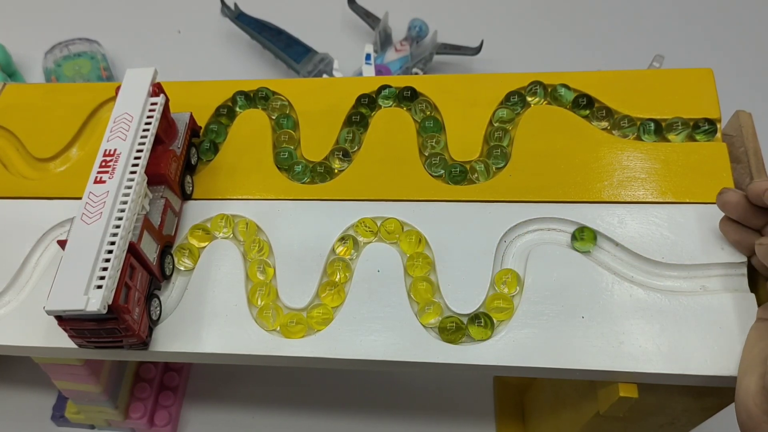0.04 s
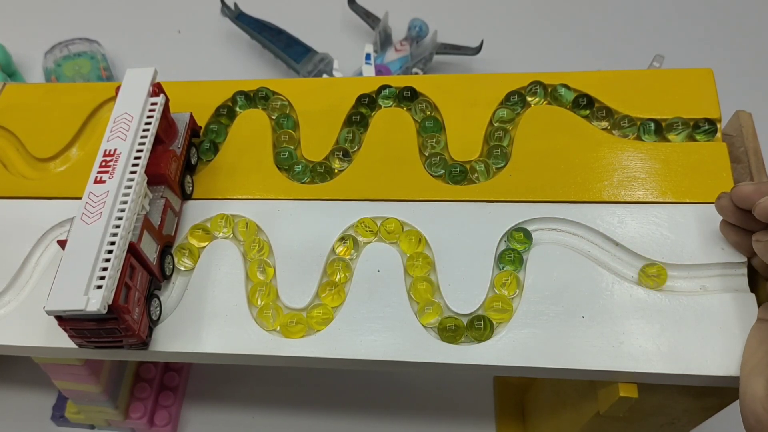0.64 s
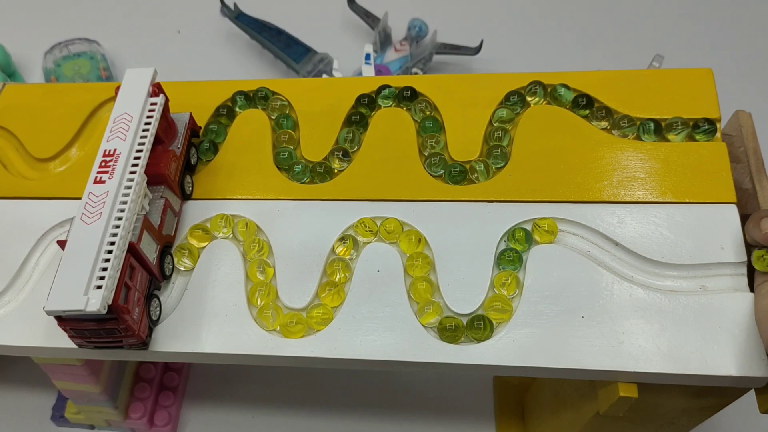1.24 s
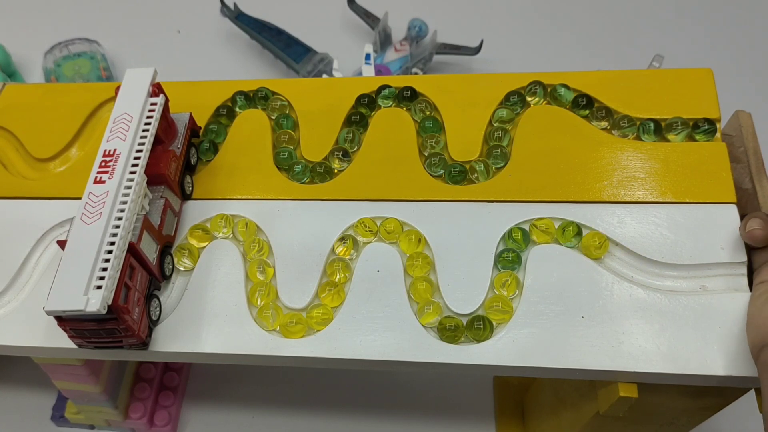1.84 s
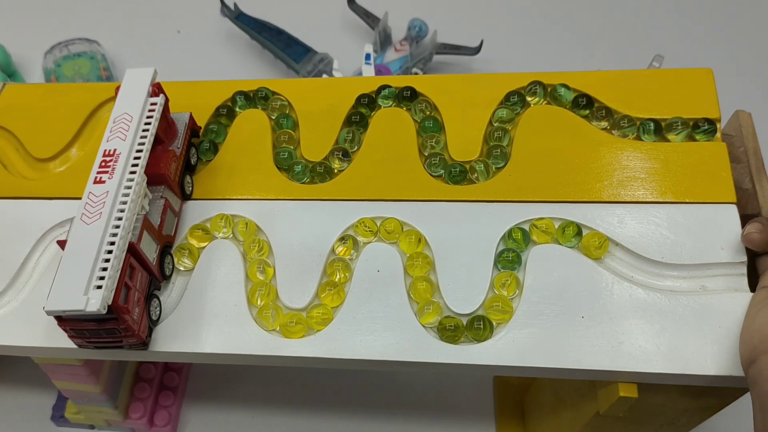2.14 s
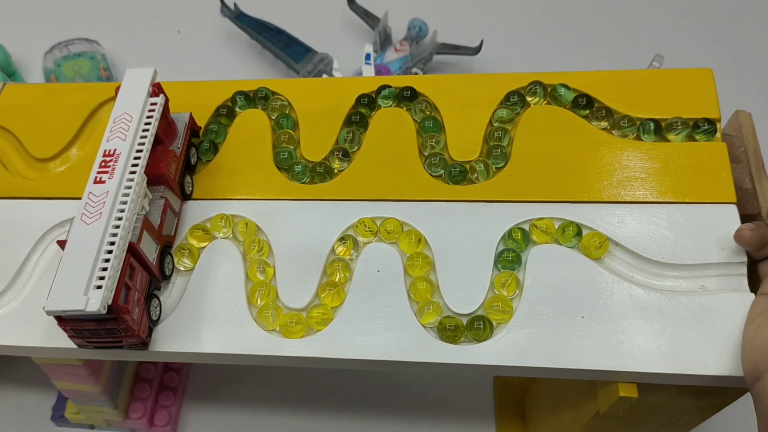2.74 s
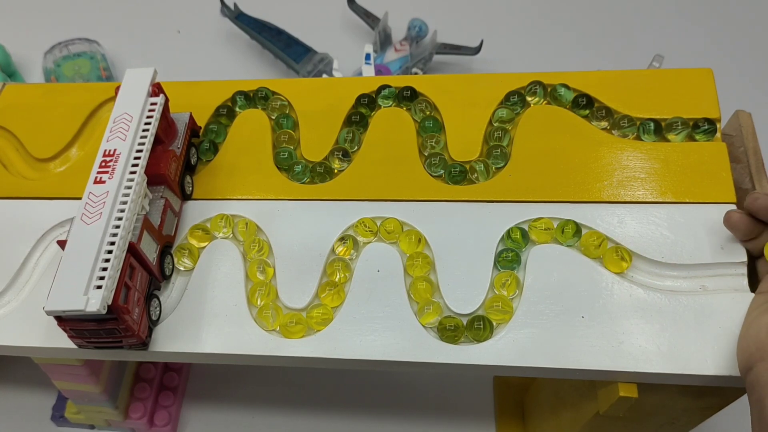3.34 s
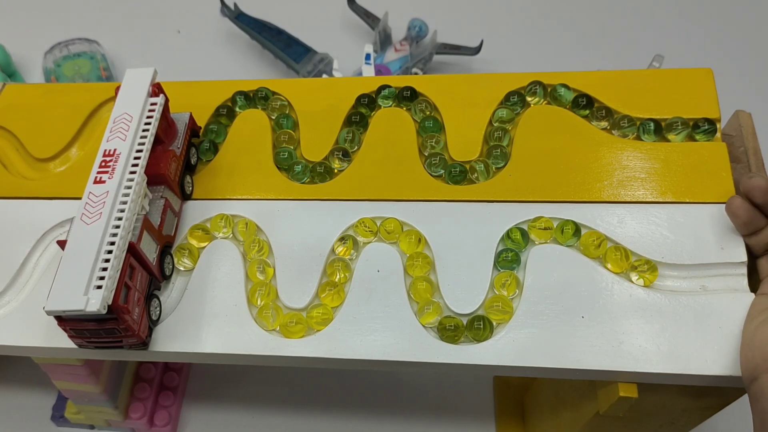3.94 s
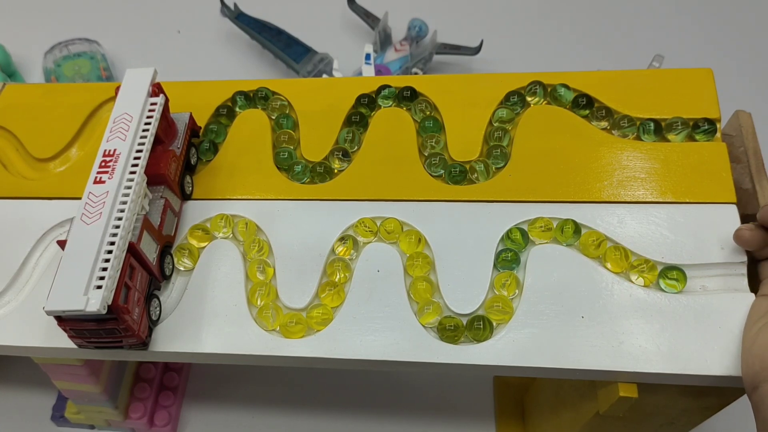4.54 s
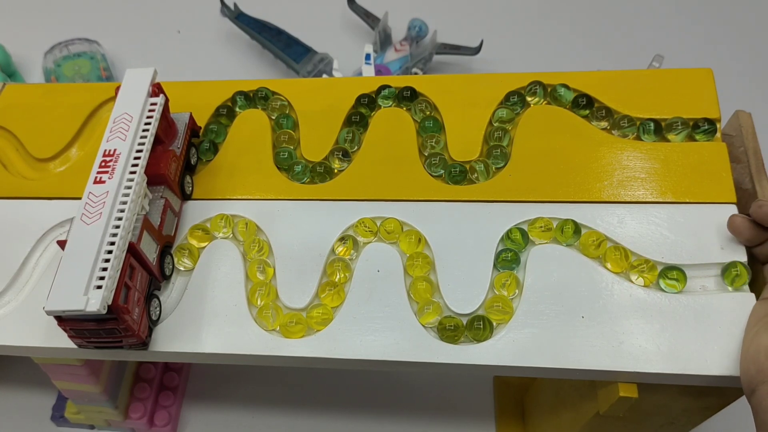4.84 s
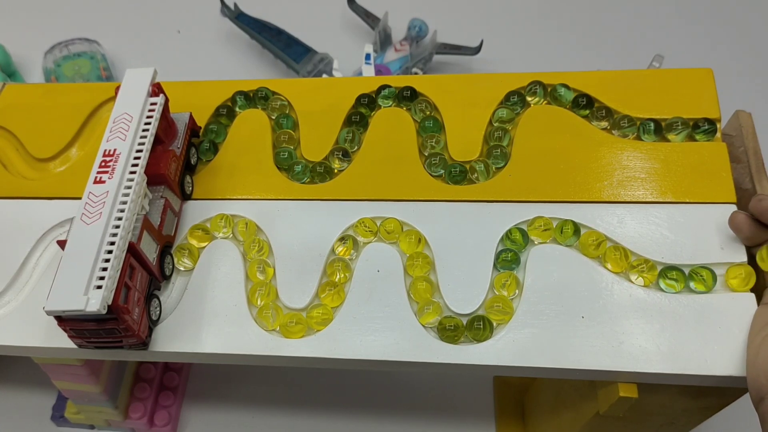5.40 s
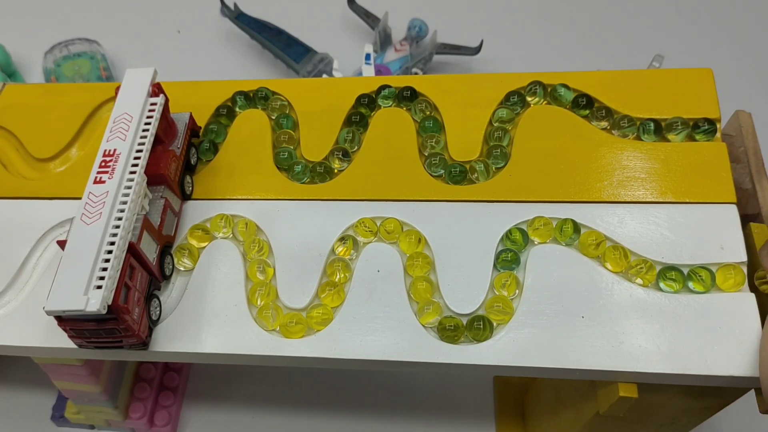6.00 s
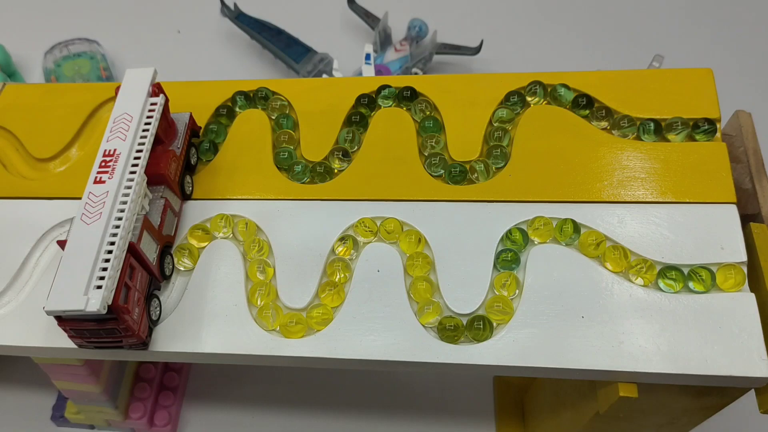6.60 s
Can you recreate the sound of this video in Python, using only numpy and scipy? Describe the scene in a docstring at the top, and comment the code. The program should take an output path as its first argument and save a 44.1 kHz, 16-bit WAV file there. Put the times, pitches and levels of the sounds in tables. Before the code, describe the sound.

At arm's length in a lively room, marbles knock onto a wooden board, roll down its groove and clack into other marbles, the wood thudding and ringing under them. The clatter breaks off briefly, resumes, then gives way to a hand rubbing and bumping the board, faint ticks and a faint whir. Another string of drops and clicks follows, ending in light handling over a low hum of air.

```python
"""A bare, lively room, where glass marbles are set one by one into a winding groove in a wooden board.
Each hops and knocks near the board's end, rumbles over the grain and clacks into the waiting row:
the glass gives a short, bright click, the wood thuds and rings, the groove adds a hollow tone.
In between, a hand rubs and bumps the board and marbles tick in its grip, with a thin ring and a
faint whir. A quiet hum of air lies under it all."""
import sys
import numpy as np
from scipy import signal
from scipy.fft import rfft, irfft, next_fast_len
from scipy.io import wavfile
from scipy.ndimage import uniform_filter1d

SR = 44100
rng = np.random.default_rng(int(sys.argv[2]) if len(sys.argv) > 2 else 0)


def write(x):
    x = np.atleast_2d(x).T
    wavfile.write(sys.argv[1], SR, np.round(np.clip(x, -1, 1) * 32767).astype(np.int16))


N = 293706
SIZE = next_fast_len(N + SR)  # a spare second for the tails
TIME = np.arange(SIZE) / SR
FREQ = np.maximum(np.arange(SIZE // 2 + 1) * SR / SIZE, 1)

# A marble hits the waiting row; the first leaves only its tail. Each row: time in seconds, then
# strength, direct click and board thud in dB.
CLACKS = [(-0.041, -4, -9.5, 0), (0.3368, 1.5, -1, 0), (0.6723, -0.5, -1.5, -5), (0.955, 1.5, 0, -0.5),
          (1.6971, -8, -12, -14), (1.706, -2.5, -2, -1.5), (1.7436, 1.5, -2.5, -1.5), (3.4541, 0, -4.5, 1),
          (3.7885, -0.3, -5.5, -2.5), (4.3444, 0.5, -5.5, -2), (5.0585, 0.5, -5.5, -1.5),
          (5.5816, -14.5, -18, -11), (5.5918, -0.5, -7, -5.5)]
# A marble drops in and hops. Each row: time in seconds, then board's end, middle and first hard contact
# in dB, first hop in seconds, change per hop in dB.
DROPS = [(0.0024, -2.5, -10.5, -18.5, 0.033, -7.5), (0.3637, -2, -14, -18, 0.151, -7.5),
         (1.489, 1.5, -4.5, -6, 0.1015, -3), (3.29, -0.5, -7, -11.5, 0.062, -3.5),
         (3.6245, -2, -20, -13, 0.039, -9), (4.2224, 0.5, -7, -6, 0.043, -6.5),
         (4.9942, 1.5, -8.5, -9, 0.089, -3.5), (5.399, -8, -10, -15.5, 0.041, -4)]
# Knocks on the groove's wall. Each row: time in seconds, then board's end, middle and contact in dB.
KNOCKS = [(0.185, -14, -24, -24), (0.2779, -5, -2, -15), (0.629, -13.5, -9, -36),
          (0.6929, -5.5, -18.5, -19), (0.7143, -4.5, -5, -7.5), (0.8908, -8.5, -13, -14),
          (1.4404, -8, -4.5, -29), (1.5365, -4, -18, -11.5), (1.734, -5.5, -19, -6),
          (5.1585, -8.5, -30, -12), (5.3746, -22, -8.5, -39)]
# Runs down the groove. Each row: start and length in seconds, then opening levels of the board's end,
# its middle and the hollow tone in dB.
ROLLS = [(0.0, 0.38, -46, -49, -49.5), (0.344, 0.36, -43.5, -53, -52.5), (0.684, 0.33, -45.5, -47.5, -53.5),
         (1.491, 0.22, -34.5, -50, -44.5), (3.276, 0.17, -48, -48, -53), (3.622, 0.152, -45.5, -48, -61),
         (4.21, 0.15, -40.5, -54, -57), (4.997, 0.18, -41, -48.5, -57), (5.39, 0.1, -44, -46.5, -65)]
# A fader on the clatter, with one abrupt dip. Each row: time in seconds, gain in dB.
CLATTER_FADER = [(1.03, 0), (1.08, -5), (1.1, -11), (1.12, -40), (1.4, -30), (1.43, 0)]
# The board's clear modes. Each row: pitch in Hz, t60 in seconds, dB struck mid-board, dB at the end.
BOARD_MODES = [(115, 0.049, -37, -44), (152.3, 0.27, -21, -24), (350, 0.13, -17.5, -12),
               (427.9, 0.19, -11, -20), (515, 0.15, -19, -18.5), (833, 0.066, -7, -8),
               (865, 0.144, -28, -39), (1040, 0.068, -17, -17), (1277.4, 0.073, -19.5, -9.5),
               (1740, 0.18, -23, -28), (1772, 0.055, -38, -6), (1888, 0.037, -28, -7),
               (1968, 0.17, -13, -2), (2058, .12, -14.5, -8), (2124, 0.013, -29, -5.5),
               (2200, 0.16, -21, -15), (2310, 0.049, -27, -21), (2389, .1, -34, -13),
               (3163, 0.017, -17.5, -7)]
# Ringing tones. Each row: pitch in Hz, level in dB, t60 in seconds.
GROOVE_MODES = [(789, -7, 0.15), (811, 1.5, 0.23), (838.4, -3.5, .14)]  # the hollow of the groove
SHIMMER_MODES = [(5770, -10.5, 0.013), (8367, -1, 0.054)]  # the thin ring as the hand moves
# Tone colours. Each row: frequency in Hz, relative level in dB.
MIDDLE_EQ = [(30, -13), (60, -32.5), (100, -13), (160, -24.5), (210, -13.5), (300, -5.5), (420, 0),
             (630, -7.5), (820, -0.5), (1050, -3), (1300, 0), (2000, -2.5), (3000, -7.5), (5000, -39),
             (9000, -33), (16000, -61)]  # dense, short-lived modes mid-board
END_EQ = [(30, -38), (60, -30), (110, -17.5), (155, -19.5), (210, -13), (350, -11.5), (650, -16),
          (900, -4.5), (1550, -6.5), (1850, -6), (2150, 3.5), (2450, 2), (2900, -8.5), (4200, -12),
          (5500, -21), (9000, -23), (16000, -49)]  # the same at the board's end
FLEX_EQ = [(50, -28), (90, -6.5), (115, -0.5), (155, 2.5), (200, -18), (300, -28.5),
           (1000, -69.5)]  # the overhanging end flexing under a marble
CLICK_EQ = [(300, -23), (2000, -25), (4000, -9), (5500, -11), (6800, -5), (8600, -3), (10000, -8),
            (11200, -14.5), (12500, -16), (14500, -15), (16000, -20.5)]  # glass on glass in the row
CONTACT_EQ = [(800, -53), (2500, -12.5), (3300, 5.5), (4300, 1), (5500, -9), (9000, -11), (11000, -20),
              (16000, -18)]  # glass on wood
TICK_EQ = [(500, -52), (2500, -13.5), (4500, -9.5), (5800, -4.5), (6500, 1.5), (7300, -1.5), (8500, -11),
           (13000, -16), (16000, -31)]  # glass on glass in the hand
HAND_EQ = [(35, -38), (60, -22), (100, -17.5), (190, -12.5), (300, -2), (400, -1.5), (520, -3), (640, -6.5),
           (900, -2), (1150, -9), (1750, -13), (2500, -25), (5000, -31), (11000, -40)]  # skin on wood
AIR_EQ = [(15, -44), (25, -43), (92, 2), (249, -3.5), (335, -4.5), (714, -7), (863, -3), (1160, -12.5),
          (1440, -11.5), (2610, -20.5), (7510, -26.5), (8590, -24.5), (9320, -26), (14400, -27),
          (16000, -43.5)]  # room tone
# Placement of the direct click. Each row: frequency in Hz, left minus right in dB.
CLICK_PAN = [(5000, -0.5), (8500, -12), (10500, -14), (13000, 5)]
# Marbles touch in the hand. Each row: time in seconds, room send in dB, direct sound in dB.
TICKS = [(2.323, -32, -33), (2.473, -23.5, -35), (2.608, -35, -35), (2.929, -29, -37.5), (6.4867, -25, -23)]
# The hand shifts on the board. Each row: start and length in seconds, then rub and thin ring in dB.
HAND_SHIFTS = [(1.15, 0.14, -53.5, -68.5), (1.948, 0.11, -52, -61), (2.315, 0.078, -52.5, -50),
               (2.571, 0.087, -53.5, -55), (2.915, 0.058, -52, -65), (3.065, 0.044, -63, -77),
               (3.238, 0.078, -47, -66), (4.67, 0.069, -59, -71), (4.897, 0.047, -61, -85),
               (5.967, 0.037, -57, -88), (6.153, 0.038, -59, -75), (6.345, 0.045, -61.5, -88)]
# Soft bumps of the hand. Each row: time in seconds, level in dB.
HAND_BUMPS = [(2.303, -18), (2.321, -17), (2.61, -15.5), (2.63, -22), (3.084, -27.5), (4.209, -15),
              (4.99, -18)]
# The whir's glide. Each row: time in seconds, pitch in Hz, level in dB.
WHIR_GLIDE = [(2.099, 1920, -69), (2.401, 1840, -59), (2.65, 1707, -78), (2.85, 1680, -70),
              (3.05, 1766, -66.5), (3.249, 1795, -71)]
# The room's decay. Each row: frequency in Hz, t60 in seconds.
ROOM_T60 = [(100, 0.73), (400, 0.86), (1000, 0.7), (1414, 0.69), (2000, 0.91), (2830, 0.69), (4500, 0.77),
            (8500, 0.7), (15000, 0.45)]
# Stereo image of diffuse sound. Each row: frequency in Hz, left-right correlation.
STEREO_LIKENESS = [(60, 0.91), (250, 0.88), (500, 0.8), (1000, 0.046), (2000, 0), (16000, 0)]


def marbles():
    """Clacks, knocks and rolling drive the board; wood and glass ring out into the room."""
    clack_s, strength_db, click_db, thud_db = np.transpose(CLACKS)
    clacks, thuds = blows(clack_s, strength_db), blows(clack_s, thud_db)
    hit_end, hit_middle, hit_contact = impacts()
    roll_end, roll_middle, roll_hollow = runs(clacks)
    on_end, on_middle = hit_end + roll_end, thuds + hit_middle + roll_middle
    wood = board(on_middle, MIDDLE_EQ, column=2, bloom_t60=0.024,
                 dense_db=-5.5, dense_t60=0.16, modes_db=-0.5)
    wood += board(on_end, END_EQ, column=3, bloom_t60=0.068, dense_db=-10, dense_t60=0.2, modes_db=-3)
    wood += undb(-6) * convolve(thuds, pulse(MIDDLE_EQ))  # the thud's dry punch
    wood += undb(-22.5) * convolve(flurry(on_end, t60=0.25), pulse(FLEX_EQ))
    hollow = convolve(roll_hollow + undb(-25) * thuds, rings(GROOVE_MODES))
    contact = convolve(flurry(hit_contact, t60=0.022), pulse(CONTACT_EQ))
    # a click is beamed along the line of the two marbles, so listener and room get different shares
    glass = glass_click(blows(clack_s, click_db))
    spill = convolve(clacks, pulse(CLICK_EQ))
    send = undb(-0.5) * wood[0] + undb(-13) * hollow[0] + undb(-2) * contact[0] + spill
    echo = room(send, build_s=0.009, early_db=-9, early_t60=0.39)
    fader = undb(np.interp(TIME, *np.transpose(CLATTER_FADER)))
    return (wood + hollow + contact + glass + echo) * fader


def glass_click(force, direct_db=-5, smear_t60=0.01, groove_db=-8, groove_t60=0.03):
    """A very short click, smeared by the marbles beside it and scattered by the groove."""
    click = undb(direct_db) * force + flurry(force, smear_t60)
    placed = irfft(rfft(click) * pan(over_hz(CLICK_PAN)), SIZE)
    scattered = undb(groove_db) * flurry(force, groove_t60)
    return convolve(placed + scattered, pulse(CLICK_EQ))


def impacts(hop_contact_db=-12.5):
    """Drops and wall knocks push on the board's end, on its middle and at the hard contact."""
    s, end_db, middle_db, contact_db, hop_s, hop_db = np.transpose(DROPS)
    end, middle = bounces(s, end_db, hop_s, hop_db), bounces(s, middle_db, hop_s, hop_db)
    hops = end - blows(s, end_db)
    contact = blows(s, contact_db) + undb(hop_contact_db) * hops
    s, end_db, middle_db, contact_db = np.transpose(KNOCKS)
    return end + blows(s, end_db), middle + blows(s, middle_db), contact + blows(s, contact_db)


def runs(clacks):
    """Rolling marbles shake the board's end, middle and groove; the struck row shuffles on mid-board."""
    start, length, end_db, middle_db, hollow_db = np.transpose(ROLLS)
    # gathering speed, a marble leaves the end behind while the middle and the hollow tone swell
    end, middle, hollow = (
        strokes(start, length, db, attack_s=0.006, release_t60=0.049, db_per_s=slope)
        for db, slope in [(end_db, -32.5), (middle_db, 18), (hollow_db, 18)])
    shuffle = undb(-38.5) * convolve(clacks, pad(fade(t60=0.44)))
    grain = roughness(bumps_per_s=260, scatter_db=5)
    fine_grain = roughness(bumps_per_s=1000, scatter_db=4)
    return grain * end, grain * (middle + shuffle), fine_grain * hollow


def board(force, eq, column, bloom_t60, dense_db, dense_t60, modes_db):
    """The wood at one spot: bending waves smear the blow, then dense and clear modes ring on."""
    bloom = undb(-1.5) * flurry(force, bloom_t60, rise_s=0.00098)
    dense = undb(dense_db) * flurry(force, dense_t60)
    modes = rings([(mode[0], mode[column], mode[1]) for mode in BOARD_MODES])
    return convolve(bloom + dense, pulse(eq)) + undb(modes_db) * convolve(force, modes)


def ticks(left_db=12, chatter_s=0.0033, chatter_db=-5):
    """Marbles rebound off each other in the hand, close by on the left."""
    s, send_db, direct_db = np.transpose(TICKS)
    direct = pan(left_db) * bounces(s, direct_db, chatter_s, chatter_db)
    echo = room(bounces(s, send_db, chatter_s, chatter_db), build_s=0.0055, early_db=0, early_t60=0.062)
    return convolve(direct + echo, pulse(TICK_EQ))


def hand(attack_s=0.0067):
    """A hand rubs and bumps dully on the board; a thin high ring comes with each shift."""
    start, length, rub_db, ring_db = np.transpose(HAND_SHIFTS)
    rub = roughness(bumps_per_s=530, scatter_db=6)
    rub *= strokes(start, length, rub_db, attack_s, release_t60=0.3)
    push = rub + blows(*np.transpose(HAND_BUMPS))
    shimmer = convolve(rng.standard_normal(SIZE), rings(SHIMMER_MODES))
    shimmer *= strokes(start, length, ring_db, attack_s, release_t60=0.26)
    return convolve(flurry(push, t60=0.081), pulse(HAND_EQ)) + shimmer


def whir(waver_s=0.008):
    """A faint, fluttering tone glides down and up again."""
    s, hz, db = np.transpose(WHIR_GLIDE)
    waver = uniform_filter1d(rng.standard_normal(SIZE), size=round(waver_s * SR))
    tone = np.sin(2 * np.pi * np.cumsum(np.interp(TIME, s, hz)) / SR)
    return waver / np.std(waver) * tone * np.interp(TIME, s, undb(db), left=0, right=0)


def room(send, build_s, early_db, early_t60):
    """Hard walls: reflections build fast, strongest at first; each half octave fades at its own rate."""
    noise, tail = rfft(diffuse()[:, :SR]), 0
    half_octaves = 2 * np.log2(np.clip(np.arange(SR // 2 + 1), 125, 16000) / 125)
    for k in range(15):
        band = irfft(noise * np.maximum(1 - abs(half_octaves - k), 0), SR)
        tail = tail + band * fade(over_hz(ROOM_T60, 125 * 2 ** (k / 2)))
    tail = tail * ramp(build_s) * (1 + undb(early_db) * fade(early_t60))
    return convolve(send, pad(unit(tail)))


def air(level_db=-58.5):
    """Room tone: a steady, low hum of air from all sides."""
    return undb(level_db) * convolve(diffuse(), pulse(AIR_EQ))


def blows(times, db):
    """One impulse per event; those before zero wrap round so that their tails carry in."""
    force = np.zeros(SIZE)
    np.add.at(force, np.round(np.asarray(times) * SR).astype(int), undb(db))
    return force


def bounces(times, db, first_hop_s, hop_db, count=4, rebound=0.46):
    """A blow and its rebounds, each sooner and weaker than the last."""
    force = 0
    for k in range(count):
        force = force + blows(times, db + k * hop_db)
        times = times + first_hop_s * rebound ** k
    return force


def roughness(bumps_per_s, scatter_db):
    """Wood grain under a marble or a hand: a dense train of tiny, uneven bumps."""
    bumps = (rng.random(SIZE) < bumps_per_s / SR) * rng.choice([-1, 1], SIZE)
    force = bumps * undb(scatter_db * np.clip(rng.standard_normal(SIZE), -2, 2))
    return force / np.std(force)


def strokes(start_s, length_s, db, attack_s, release_t60, db_per_s=0):
    """Envelope of several moves: each sets in, rides a slope in dB and dies away."""
    gain, age = np.zeros(SIZE), TIME[:SR]
    for start, length, level in zip(start_s, length_s, db):
        release = np.exp(-np.log(1000) * np.maximum(age - length, 0) / release_t60)
        first = max(round(start * SR), 0)
        gain[first:first + SR] += undb(level + db_per_s * age) * ramp(attack_s) * release
    return gain


def flurry(force, t60, rise_s=0.000086):
    """Each push breaks up into its own short stereo flurry of scattered waves."""
    shape = fade(t60) * ramp(rise_s)
    power = convolve(force ** 2, pad(unit(shape)) ** 2)
    noise = diffuse()
    return np.sqrt(np.maximum(power, 0)) * noise / np.std(noise)


def rings(modes):
    """Damped sines from rows of Hz, dB and t60; higher ones tend to spread wider in stereo."""
    ring = 0
    for hz, db, t60 in modes:
        phase = rng.uniform(0, 2 * np.pi) + np.array([[0], [1]]) * rng.standard_normal() * hz / 900
        ring = ring + undb(db) * unit(np.sin(2 * np.pi * hz * TIME[:SR] + phase) * fade(t60))
    return pad(ring * ramp(rise_s=0.0009))


def diffuse():
    """Stereo noise from all sides: narrow in the bass, wide in the treble."""
    mid, side = rfft(rng.standard_normal((2, SIZE)))
    alike = np.clip(over_hz(STEREO_LIKENESS), -.99, .99)
    mid, side = mid * np.sqrt((1 + alike) / 2), side * np.sqrt((1 - alike) / 2)
    return irfft([mid + side, mid - side], SIZE)


def pulse(eq):
    """The tightest pulse with a given tone colour (minimum phase)."""
    cepstrum = irfft(np.log(undb(over_hz(eq))), SIZE)
    cepstrum[1:SIZE // 2] *= 2
    cepstrum[SIZE // 2 + 1:] = 0
    return unit(irfft(np.exp(rfft(cepstrum)), SIZE))


def ramp(rise_s):
    """A linear attack, held to the end of one second."""
    return np.minimum(TIME[:SR] / rise_s, 1)


def fade(t60):
    """One second of exponential decay, falling 60 dB in t60 seconds."""
    return np.exp(-np.log(1000) * TIME[:SR] / t60)


def pan(left_db):
    """Stereo gains with the left side ahead by so many dB."""
    return undb(np.array([[.5], [-.5]]) * left_db)


def pad(x):
    """Extend a one-second response with silence."""
    return np.concatenate([x, np.zeros(x.shape[:-1] + (SIZE - SR,))], axis=-1)


def convolve(x, response):
    """Play a signal through a response."""
    return irfft(rfft(x) * rfft(response), SIZE)


def over_hz(points, hz=FREQ):
    """Read a curve on a log-frequency axis."""
    f, value = np.transpose(points)
    return np.interp(np.log(hz), np.log(f), value)


def unit(x):
    """Scale a response to unit energy."""
    return x / np.sqrt(np.sum(x ** 2, axis=-1, keepdims=True))


def undb(db):
    """Decibels to gain."""
    return 10 ** (np.asarray(db) / 20)


def scene():
    """The mix: marbles and hand at arm's length, over a quiet bed of air."""
    handling = hand() + whir()
    handling_echo = undb(-1) * room(handling[0], build_s=0.0068, early_db=-5, early_t60=0.036)
    near = marbles() + handling + handling_echo + ticks()
    travel = round(0.0012 * SR)  # samples on the way to the listener
    return (np.roll(near, travel, axis=-1) + air())[:, :N]


def record(dry, low_cut_hz=38, top_hz=15400):
    """Master EQ: roll off the deepest bass and cut the very top steeply."""
    lean = signal.sosfilt(signal.butter(2, low_cut_hz, "highpass", fs=SR, output="sos"), dry)
    return signal.sosfilt(signal.ellip(8, .2, 70, top_hz, fs=SR, output="sos"), lean)


dry = scene()
out = record(dry)
write(out)
```